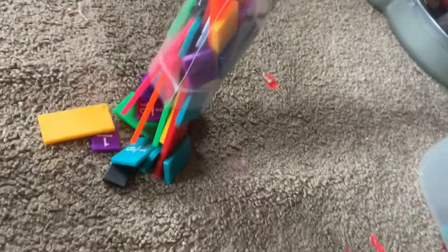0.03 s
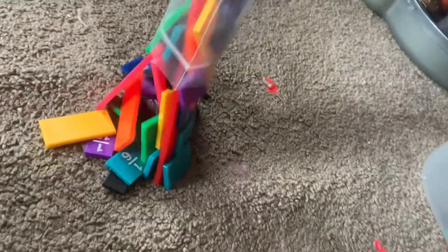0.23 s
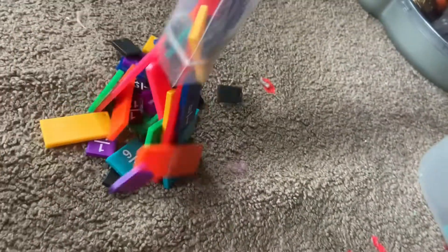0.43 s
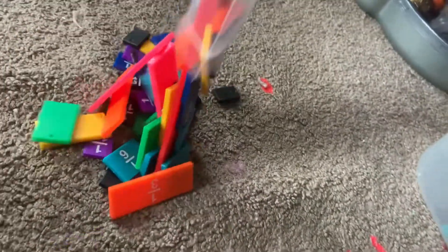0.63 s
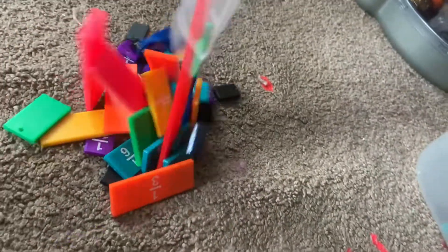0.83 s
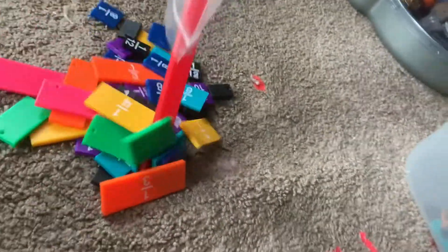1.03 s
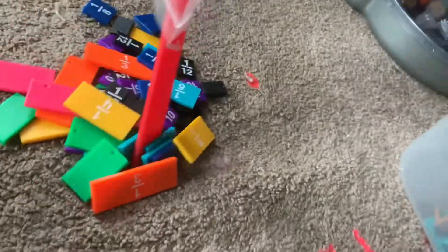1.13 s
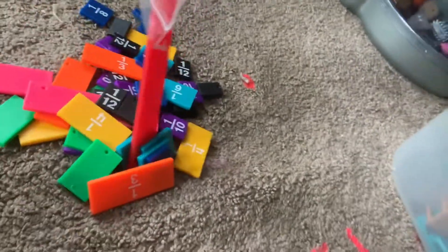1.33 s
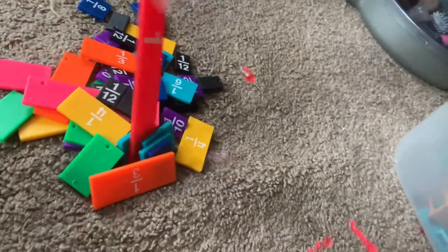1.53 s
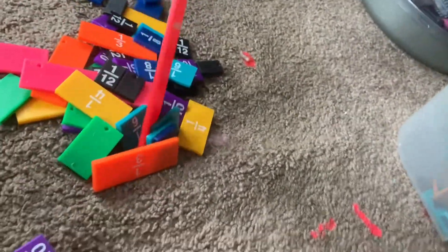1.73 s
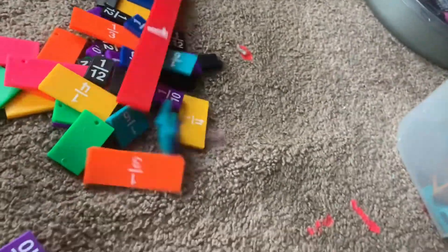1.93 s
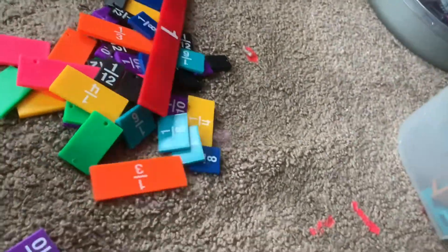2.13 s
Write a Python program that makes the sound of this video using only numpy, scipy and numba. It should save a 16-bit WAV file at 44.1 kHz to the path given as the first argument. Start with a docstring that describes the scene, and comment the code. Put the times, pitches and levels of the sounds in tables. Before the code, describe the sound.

Plastic pieces pour and rattle together up close, pause, then the last few topple with a loud clack

```python
"""On a carpet, close to a phone, small plastic tiles slide out of a soft bag and clatter onto a pile.
Many tiny knocks ring the tiles' short modes, and each knock adds a dry snap.
The bag rustles as crackling noise, pieces thud and tick as short low rings, and the room hums as soft
low noise. After a lull the last tiles topple with a click."""
import sys
import numpy as np
from scipy import signal
from scipy.fft import rfft, irfft
from scipy.io import wavfile
from scipy.ndimage import uniform_filter1d
from numba import njit

SR = 44100
rng = np.random.default_rng(int(sys.argv[2]) if len(sys.argv) > 2 else 0)


def volts_from_db(level):
    """Convert decibel levels to linear amplitude ratios."""
    exponent = np.asarray(level, float) / 20
    return 10 ** exponent


def dump(signal):
    """Clip the signal to [-1, 1] and save it as 16-bit WAV at the path in sys.argv[1]."""
    limited = np.clip(np.atleast_2d(signal).T, -1, 1)
    pcm = np.round(limited * 32767).astype(np.int16)
    wavfile.write(sys.argv[1], SR, pcm)


N = 97020  # length in samples (2.2 s)

# ringing tones (modes) of a plastic tile: (frequency [Hz], level [dB], time to fade by 60 dB [s])
TILE_MODES = [(1236, -12.5, 0.06), (1480, -8, 0.025), (1630, -10, 0.039), (2080, -12, 0.02),
              (2500, -17, 0.044), (2990, -10.5, 0.078), (3428, -5.5, 0.075), (3850, -2.5, 0.032),
              (4473, -9.5, 0.061), (5154, -12, 0.18), (5960, -11, 0.055), (6280, 1, 0.053),
              (6482, -7, 0.012), (6770, -4, 0.029), (7420, -8, 0.15), (8350, -8, 0.067)]
# how the pour swells and lulls: (time [s], clatter level [dB], rustle level [dB])
POUR_LEVELS = [(0, -35, -37), (.05, -37.5, -32.5), (.08, -35, -47.5), (.16, -39, -40.5), (.2, -34, -36),
               (.26, -30.5, -57), (.36, -38, -51), (.4, -36, -46), (.47, -49.5, -51.5), (.51, -41, -46),
               (.567, -45, -46.5), (.574, -28.5, -62), (.65, -30.5, -47), (.75, -38, -45), (.8, -34, -39),
               (.85, -32, -43.5), (.9, -33, -43), (.96, -31, -53), (1.03, -37, -54), (1.11, -42, -48),
               (1.22, -57, -58.5), (1.29, -45, -48), (1.33, -78, -65), (1.4, -103, -79.5),
               (1.47, -58.5, -53.5), (1.515, -95, -74), (1.57, -82, -57), (1.63, -74.5, -61.5),
               (1.68, -90, -59.5), (1.73, -89, -71), (1.765, -71, -84), (1.785, -60, -49),
               (1.85, -45, -54.5), (1.895, -29, -46), (1.93, -31.5, -39.5), (1.995, -48.5, -44.5),
               (2.02, -35.5, -47), (2.06, -46.5, -48), (2.12, -58, -55), (2.2, -69, -41)]


def col(table, k):
    """One column of a table."""
    return np.array(table, float)[:, k]


def curve(table, k):
    """A dB column joined by straight lines over time, as gain."""
    return volts_from_db(np.interp(np.arange(N) / SR, col(table, 0), col(table, k)))


def unit(x):
    """Scale to an rms of 1."""
    return x / np.sqrt(np.mean(x ** 2))


def colour(x, points, sign=1, late=0):
    """Filter by (frequency [Hz], gain [dB]) points, with a delay in seconds; sign -1 flips the gains."""
    hz = np.arange(N // 2 + 1) * SR / N + 1e-9
    db = np.interp(np.log(hz), np.log(col(points, 0)), col(points, 1))
    delay = np.exp(-2j * np.pi * hz * late)
    return irfft(rfft(x) * volts_from_db(sign * db) * delay, N)


def clicks(times, size):
    """Single-sample impulses at the given times."""
    places = np.clip((times * SR).astype(int), 0, N - 1)
    return np.bincount(places, size, N)


def flicker(rate, db):
    """A gain that wanders by about db at about rate a second: random steps, smoothed twice."""
    k = int(SR / rate)
    steps = np.repeat(rng.standard_normal(N // k + 1), k)
    smooth = uniform_filter1d(uniform_filter1d(steps, k), k)[:N]
    return volts_from_db(db * np.sqrt(2) * smooth)


@njit
def ring(n, start, turn, fade, gain, rise):
    """Sum of sines that swell briefly and decay, each stopped at -50 dB."""
    out = np.zeros(n)
    for j in range(len(start)):
        # a spinning arrow that shrinks a little every sample
        spin, arrow, unrisen = np.exp(1j * turn[j] - fade[j]), gain[j] + 0j, 1.
        for i in range(start[j], min(n, start[j] + int(5.8 / fade[j]))):
            arrow *= spin
            unrisen *= rise
            out[i] += arrow.imag * (1 - unrisen)
    return out


def strike(times, hz, t60, gain):
    """A blow sets modes ringing, each fading at its own pace (rows = blows, columns = modes)."""
    rise_s = 0.0013  # time constant of the swell
    grids = np.broadcast_arrays(times, hz, t60, gain)
    times, hz, t60, gain = (np.ascontiguousarray(a).ravel() for a in grids)
    fade = np.log(1000) / (np.maximum(t60, .005) * SR)
    start = (times * SR).astype(np.int64)
    return ring(N, start, 2 * np.pi * hz / SR, fade, gain, np.exp(-1 / (rise_s * SR)))


def crack(times, size):
    """The dry broadband snap of a contact: a spike and a brief fizz of fading noise."""
    fizz_s = 0.00069  # time constant of the fizz
    # tone of the snap: (frequency [Hz], gain [dB])
    snap_tone = [(250, -45), (600, -8.5), (1000, 5.5), (2000, -2), (4000, 5), (6300, 5), (8500, 1.5),
                 (10000, -12.5), (13000, -34)]
    t = np.arange(256) / SR
    spike = clicks(times, size)
    fizz = signal.fftconvolve(spike, np.exp(-t / fizz_s))[:N] * rng.standard_normal(N)
    return colour(volts_from_db(8.5) * spike + volts_from_db(-4) * fizz, snap_tone)


def lows():
    """Low rumble and a dull shuffle: filtered noise, partly different at left and right."""
    # swell of the low sounds: (time [s], rumble level [dB], shuffle level [dB])
    low_levels = [(0, -65, -49), (.02, -50, -37), (.07, -41.5, -45.5), (.17, -66, -48.5), (.21, -52, -43),
                  (.39, -52, -52), (.43, -45.5, -53.5), (.54, -66.5, -50), (.79, -45, -48.5),
                  (.84, -55, -52), (.97, -55.5, -54.5), (1.42, -61, -55.5), (1.69, -56, -51),
                  (1.75, -62, -58.5), (1.95, -53.5, -51), (1.99, -44.5, -53.5), (2.14, -67, -54.5),
                  (2.2, -54, -43.5)]
    # tone of the rumble: (frequency [Hz], gain [dB])
    rumble_tone = [(20, -42.5), (40, 4), (60, 11.5), (95, 11), (140, -5), (200, -40.5)]
    # tone of the shuffle: (frequency [Hz], gain [dB])
    shuffle_tone = [(110, -3), (170, -3), (250, -6.5), (400, 0), (480, -4.5), (600, -10), (1200, -14.5),
                    (3000, -59)]
    side = 0.4 * np.array([[1], [-1]])  # share of noise that is opposite at left and right
    noise = rng.standard_normal((4, N))
    rumble = unit(colour(noise[0] + side * noise[1], rumble_tone))
    rumble = rumble * curve(low_levels, 1) * flicker(13.0, 1.2)
    shuffle = unit(colour(noise[2] + side * noise[3], shuffle_tone))
    shuffle = shuffle * curve(low_levels, 2) * flicker(22, 2.2)
    return rumble + shuffle


def rustle():
    """Thin bag film and sliding tiles: dense crackle of uneven grains over a hiss."""
    per_second, spread_db = 1500, 4
    # tone of the rustle: (frequency [Hz], gain [dB])
    rustle_tone = [(250, -51), (500, -47), (800, -3.5), (1500, 2.5), (2600, -2), (3500, -3), (6300, -3),
                   (8500, -20.5), (10500, -52)]
    chance = rng.random((int(per_second * N / SR), 3))
    size = volts_from_db(-spread_db * np.log(0.0097 + chance[:, 1]))  # many small grains, few big ones
    sign = np.sign(chance[:, 2] - .5)
    crackle = unit(clicks(chance[:, 0] * N / SR, size * sign))
    noise = crackle + volts_from_db(-10) * rng.standard_normal(N)
    return unit(colour(noise * flicker(25.38, 0.72), rustle_tone)) * curve(POUR_LEVELS, 2)


def thuds():
    """Dull landings on the carpet: three quickly fading low tones, spread over about an octave."""
    # pieces landing: (time [s], level [dB], pitch [Hz])
    landings = np.array([(0.014, -28.5, 410), (0.529, -36, 327), (0.604, -29.5, 347), (0.791, -27, 285),
                         (1.004, -32, 260), (1.159, -32, 397), (1.56, -40, 455), (1.595, -30, 323),
                         (1.858, -19, 443), (1.97, -29, 432), (2.078, -43, 337)], float)
    t60_s = 0.03
    hz = landings[:, 2:] * np.array([.72, 1.01, 1.55])
    gain = volts_from_db(landings[:, 1:2] + np.array([-9, -3, -3]))
    return strike(landings[:, :1], hz, t60_s, gain)


def ticks():
    """Bag and shifting tiles: short low rings and a faint snap; a tile lying flat rings on. The row at 1.86 s
    adds a higher ring to the loud landing there."""
    # dull ticks, and the higher ring of the landing at 1.86 s: (time [s], level [dB], pitch [Hz])
    dull_ticks = np.array([(0.0304, -23, 2560), (0.1979, -36, 1124), (0.379, -23, 2930),
                           (0.6544, -25.5, 1630), (0.9687, -26.5, 1630), (1.0544, -28.5, 1635),
                           (1.1034, -33.5, 1625), (1.2441, -37, 1780), (1.3488, -38, 2276),
                           (1.3748, -44, 1690), (1.4207, -39, 1566), (1.4416, -51, 1084),
                           (1.4616, -40.5, 1750), (1.493, -43, 1410), (1.5319, -44, 1300),
                           (1.5594, -30, 1370), (1.5794, -30.5, 900), (1.6107, -37, 1700),
                           (1.6322, -31, 960), (1.6636, -35.5, 1730), (1.6816, -41, 1137), (1.86, -20, 697),
                           (1.9044, -23, 1480), (1.9684, -25, 2050), (2.1595, -25, 1390)], float)
    short_t60_s, flat_tile_hz, flat_tile_extra_s = 0.011, 1630, 0.062
    hz = dull_ticks[:, 2:] * np.array([.7, 1.01, 1.45])
    flatness = np.exp(-(np.log2(hz / flat_tile_hz) / 0.018) ** 2)  # 1 at the flat tile's pitch
    t60 = short_t60_s + flat_tile_extra_s * flatness
    rings = strike(dull_ticks[:, :1], hz, t60, volts_from_db(dull_ticks[:, 1:2] + np.array([-5, -2, -5])))
    return rings + crack(dull_ticks[:, 0], volts_from_db(dull_ticks[:, 1] - 18.0))


def tiles(times, size, db, spread_db=4.5):
    """Every blow rings the tile modes with its own strengths and slightly shifted pitches."""
    pitch_spread = 0.0179  # as a fraction of the pitch
    chance = rng.standard_normal((len(times), 2, len(TILE_MODES)))
    gain = volts_from_db(col(TILE_MODES, 1) + db + spread_db * chance[:, 0])
    gain = gain / np.sqrt((gain ** 2).sum(1, keepdims=True))  # share size among the modes
    hz = col(TILE_MODES, 0) * (1 + pitch_spread * chance[:, 1])
    return strike(times[:, None], hz, col(TILE_MODES, 2), size[:, None] * gain)


def clatter():
    """Countless small tile-on-tile knocks follow the pour; the favoured modes wander."""
    per_second, spread_db = 330, 2.5
    kind_db = 1.5  # how much each mode wanders as other kinds of tile fall
    chance = rng.random((int(per_second * N / SR), 3))
    size = volts_from_db(-spread_db * np.log(0.054 + chance[:, 1])) * np.sign(chance[:, 2] - .5)
    i = (chance[:, 0] * (N - 1)).astype(int)  # sample at which each knock falls
    small = unit(size) * curve(POUR_LEVELS, 1)[i]
    kinds = 20 * np.log10([flicker(24.98, kind_db)[i] for _ in TILE_MODES]).T
    return tiles(i / SR, volts_from_db(1.5) * small, kinds) + volts_from_db(4) * crack(i / SR, small)


def knocks():
    """Loud knocks: a snap and a quick run of contacts that ring most near one favoured pitch."""
    # loudest knocks: (time [s], level [dB], favoured pitch [Hz], snap against the ring [dB])
    loud_knocks = np.array([(0.199, -23, 6300, 1), (0.23, -19.5, 6300, -14), (0.25, -15.5, 6260, -8),
                            (0.262, -16, 6280, -6), (0.329, -24, 5630, 6), (0.375, -22, 4430, 5.5),
                            (0.503, -32, 6300, 5.5), (0.572, -39, 2500, 5), (0.636, -14.5, 6200, -9),
                            (0.66, -38, 6540, -8), (0.6942, -17.5, 5960, 6.5), (0.7, -19.5, 5850, 5),
                            (0.7816, -11, 6434, -13), (0.792, -22, 8350, 1.5), (0.8092, -19, 6400, 3),
                            (0.821, -27, 6340, -33), (0.8315, -31, 3850, -9), (0.8435, -28, 3850, 2.5),
                            (0.85, -22, 6300, -15), (0.921, -27, 3850, 1), (0.947, -19, 6280, -20),
                            (0.969, -14.5, 6490, -4), (0.9954, -14.5, 6470, -13), (1.017, -18.5, 6010, -12),
                            (1.055, -19.5, 3850, -11), (1.073, -26, 3700, -10), (1.09, -22.5, 3800, -12),
                            (1.119, -29, 6400, -13), (1.138, -35.5, 4420, -4), (1.168, -36, 4450, -6),
                            (1.254, -31, 4440, -10), (1.269, -34, 6490, -26), (1.35, -62.5, 4600, 23.5),
                            (1.777, -37, 5190, -11), (1.859, -19.5, 4536, -8), (1.9, -2, 6513, -13),
                            (1.916, -12, 7000, -11.5), (2.01, -23, 4590, 4), (2.033, -32, 6500, 6),
                            (2.162, -37.5, 4590, 3), (2.194, -29, 4450, -22)], float)
    # run of contacts in one knock: (typical time from the snap [s], level against the knock [dB])
    contact_run = [(-.002, -10.5), (0.0005, -8), (.003, -14.5)]
    focus_octaves, focus_db = 0.058, 20.5  # width and boost of the favoured pitch
    times, level = loud_knocks[:, 0], loud_knocks[:, 1]
    octaves_off = np.log2(col(TILE_MODES, 0) / loud_knocks[:, 2:3])
    focus = focus_db * np.exp(-(octaves_off / focus_octaves) ** 2)
    out = crack(times, volts_from_db(level + loud_knocks[:, 3]))
    for late, db in contact_run:
        contact_times = times + late * (.5 + rng.random(len(times)))
        out = out + tiles(contact_times, volts_from_db(level + db), focus, spread_db=2.0)
    return out


def scene():
    """Direct sound reaches the right first; a short room tail switches among noise tails to stay diffuse."""
    room_t60_s, room_db = 0.035, -5
    tail_count, switch_s = 6, .012  # one of the tails is drawn at random every switch_s
    left_late_s = 20.4 / 44100
    # tone at the left, the right has the opposite: (frequency [Hz], gain [dB])
    left_tone = [(30, -6.5), (125, 5), (300, -0.65), (1000, 2.02), (5000, -0.16), (7000, 0), (8500, 7),
                 (11500, 1.5)]
    near = rustle() + thuds() + ticks() + clatter() + knocks()

    # scattered tails: fading noise that starts after 1 ms
    t = np.arange(int(.15 * SR)) / SR
    fade = np.exp(-np.log(1000) * t / room_t60_s) * (t > .001)
    tails = rng.standard_normal((tail_count, 2, len(t))) * fade
    tails = volts_from_db(room_db) * tails / np.sqrt((tails ** 2).sum(2, keepdims=True))

    # feed the whole sound to one tail after another, with short crossfades
    k = int(switch_s * SR)
    chosen = np.repeat(rng.integers(0, tail_count, N // k + 1), k)[:N]
    share = uniform_filter1d(1. * (chosen == np.arange(tail_count)[:, None]), k // 2, axis=1)
    wet = signal.fftconvolve((near * share)[:, None], tails, axes=2).sum(0)[:, :N]
    wet = wet + lows()

    left = colour(near, left_tone, late=left_late_s) + colour(wet[0], left_tone)
    right = colour(near + wet[1], left_tone, -1)
    return np.array([left, right])


def top_cut(x):
    """Nothing passes above the cut-off."""
    return signal.sosfilt(signal.butter(12, 15650, fs=SR, output="sos"), x)


def record(dry):
    """The overall tone dips near 640 Hz and falls away in the deepest lows and the top."""
    # overall tone: (frequency [Hz], gain [dB])
    overall_tone = [(25, -32.5), (40, 0.5), (480, 0.4), (640, -4), (850, 3.94), (7000, 1.23), (8600, -7.5),
                    (10500, -3), (15000, -11.5)]
    return top_cut(colour(dry, overall_tone))


dry = scene()
out = record(dry)
dump(out)
```